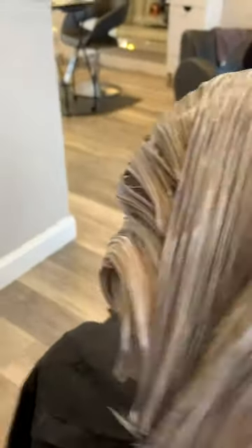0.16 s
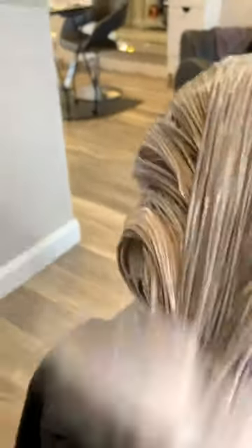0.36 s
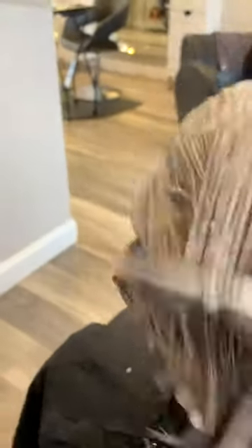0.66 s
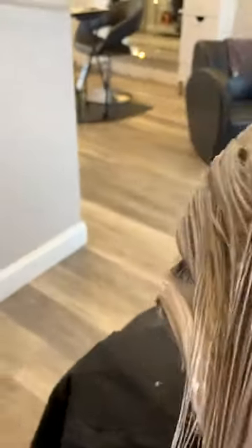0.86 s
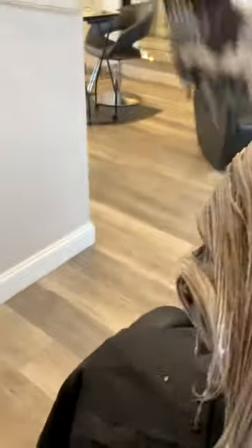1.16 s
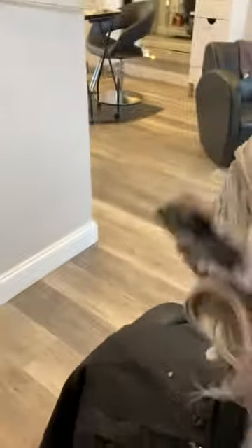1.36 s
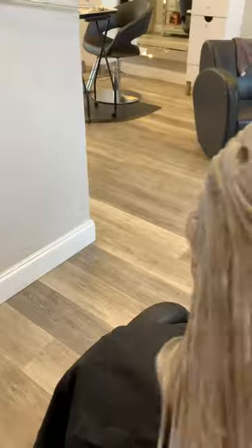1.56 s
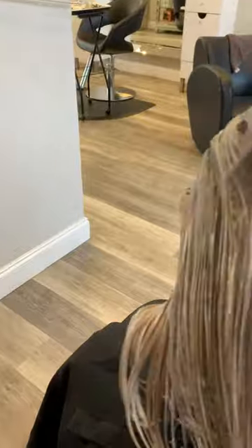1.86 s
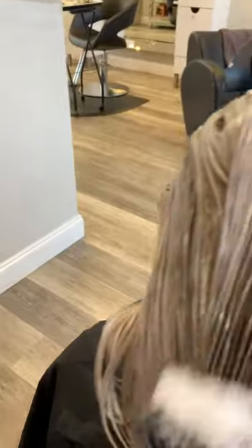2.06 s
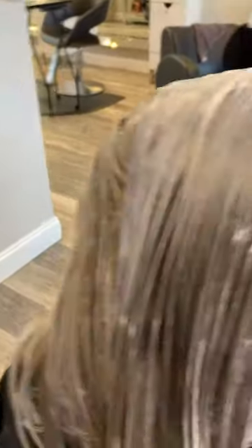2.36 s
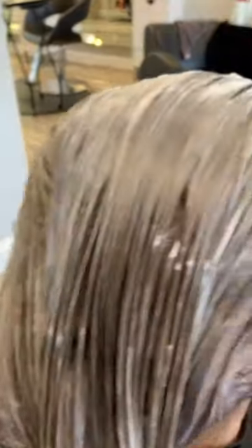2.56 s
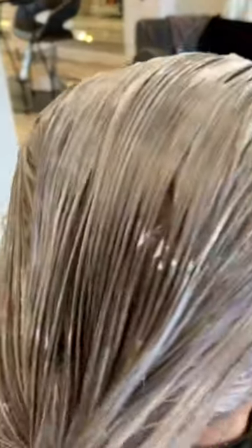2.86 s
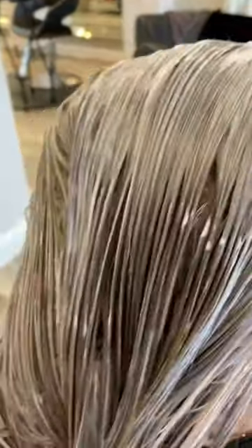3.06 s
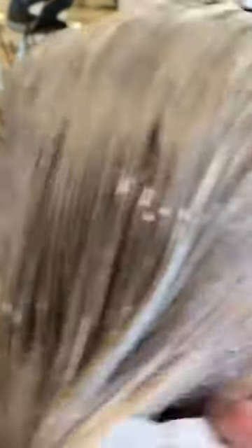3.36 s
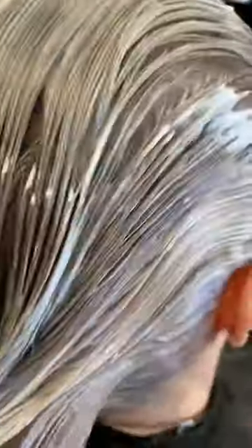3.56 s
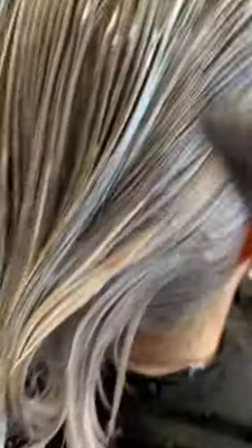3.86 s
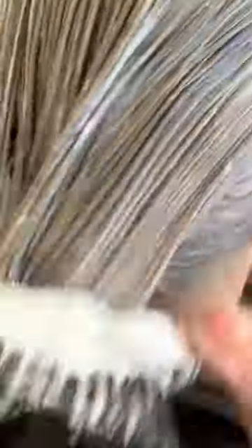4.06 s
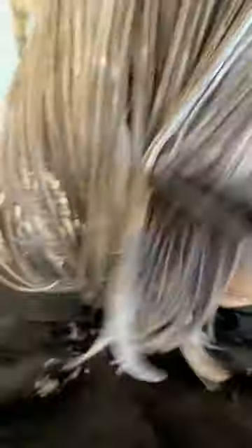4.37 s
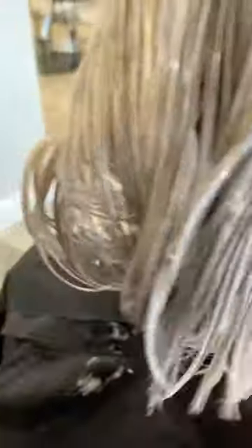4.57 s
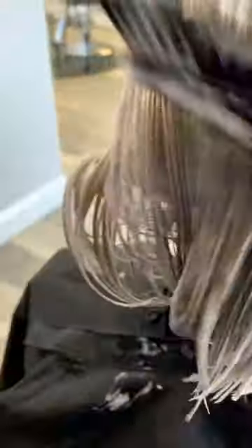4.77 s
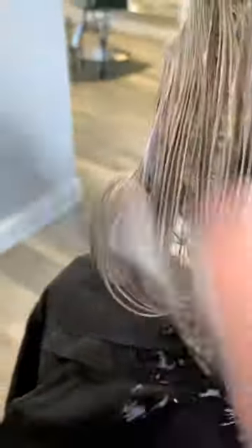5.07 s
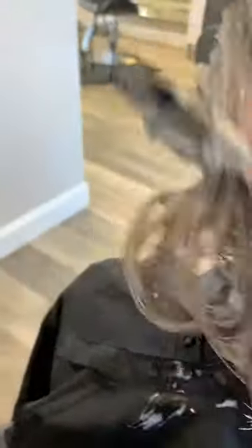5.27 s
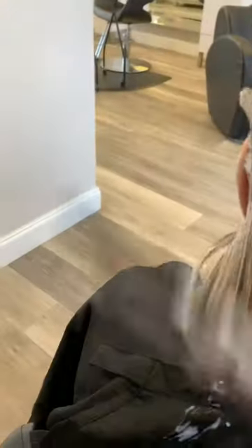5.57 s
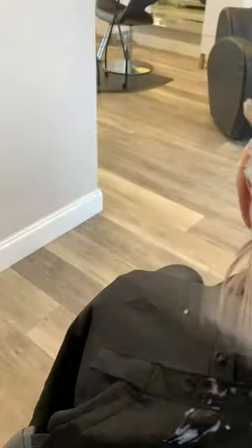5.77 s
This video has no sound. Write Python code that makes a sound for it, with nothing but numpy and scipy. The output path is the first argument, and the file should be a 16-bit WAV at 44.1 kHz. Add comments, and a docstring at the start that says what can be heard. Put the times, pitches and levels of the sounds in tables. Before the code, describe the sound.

A steady low hum, gently beating, and bassy ventilation rumble run throughout, with very faint air. The tail of a brush stroke opens at 0 s, crisp and hissy, ending by 0.2 with a thin, high squeak. Dull bumps around 0.5-0.6 lead to a crackling pull through wet hair at 0.6-0.85, then light touches and a sharp bristle click at 1.09. A longer stroke swells from 1.25 to 1.6; another, strong in the middle, runs 1.95-2.25 with a soft bump. Further pulls come at 2.55-2.9, a quieter one at 3.2, and a short one at 3.5. A loud bright swish at 3.93-4.17 is dotted with ticks. Shorter strokes follow at 4.4, 4.8, 5.2 and 5.67, with pronounced snaps near 5.13 and 5.74, ending in little ticks. Muffled cloth rustle moves beneath, strongest around 3.6-4. Everything is close and dry, with barely any room echo.

```python
"""A brush is drawn again and again through long wet hair, close to a hand-held phone in a salon.
Its strokes are a dense crackle of random slip impulses, filtered as strands and as a whole bundle.
Now and then a bristle snaps free: a click, a brief pitch, a knock of the pad and a shiver of noise.
Under it run a low hum of two sines and noise shaped as ventilation rumble, faint air and dull rustle.
A few faint squeaks and bumps are bands of noise that die away; loose hair crackles between strokes."""
import sys
import numpy as np
from scipy import signal
from scipy.fft import rfft, irfft, next_fast_len
from scipy.io import wavfile
from scipy.ndimage import uniform_filter1d, map_coordinates

SR = 44100
rng = np.random.default_rng(int(sys.argv[2]) if len(sys.argv) > 2 else 0)


def transcribe(u):
    """Save the signal u as a 16-bit wav file named by the first command-line argument.

    u: samples, shape (n,) or (channels, n), limited to [-1, 1]; the rate is SR.
    q: integer samples, one column per channel.
    """
    v = np.clip(np.atleast_2d(u).T, -1, 1)
    q = np.round(v * 32767).astype(np.int16)
    wavfile.write(sys.argv[1], SR, q)


N = 261513


def amp(db):
    """Decibels to gain."""
    return 10 ** (np.asarray(db) / 20)


def unit(x):
    """x at rms 1."""
    return x / np.sqrt(np.mean(x ** 2) + 1e-20)


def along(points, hz):
    """(Hz, value) points interpolated on a log frequency axis."""
    point_hz, value = np.transpose(points)
    return np.interp(np.log(hz + 1), np.log(point_hz + 1), value)


def clock():
    """The time of every sample in seconds."""
    return np.arange(N) / SR


def wobble(knots_per_s):
    """A smooth random curve through normally distributed knots."""
    knots = rng.standard_normal(int(N * knots_per_s / SR) + 4)
    return map_coordinates(knots, [clock() * knots_per_s])


def swells(rows):
    """A gain that swells smoothly around each (middle s, half length s, dB) row."""
    t = clock()
    return sum(amp(db) * np.exp(-((t - middle) / half) ** 2) for middle, half, db in rows)


def filtered(x, response):
    """x times a complex response of frequency."""
    size = next_fast_len(N + SR // 2)
    hz = np.fft.rfftfreq(size, 1 / SR)
    return irfft(rfft(x, size) * response(hz), size)[..., :N]


def coloured(x, spectrum):
    """x shaped by the given spectrum, at rms 1."""
    return unit(filtered(x, lambda hz: amp(along(spectrum, hz))))


def patches(shape, size):
    """A random field of rms 1 over (frequency, time), smooth over size = (bins, frames)."""
    over_hz = uniform_filter1d(rng.standard_normal(shape), size[0], axis=0)
    return unit(uniform_filter1d(over_hz, size[1], axis=1))


def patchy(x, patchy_db):
    """Stereo noise at rms 1 whose low and middle range comes and goes in small patches."""
    hz, _, z = signal.stft(x, SR, nperseg=1024)
    depth_db = patchy_db / (1 + (hz[:, None] / 3000) ** 2)
    gain = amp(depth_db * patches(z.shape[1:], size=(3, 9)))
    return unit(signal.istft(z * gain, nperseg=1024)[1][:, :N])


# Left-right likeness of room noise. Each row: frequency in Hz, correlation from 0 to 1.
LIKENESS = [(60, 1), (150, 0.89), (300, 0.046), (700, 0), (2000, 0)]


def diffuse(spectrum):
    """Stereo room noise of rms 1, alike at both ports only in the bass."""
    def mid_side(hz):
        angle = np.arccos(np.clip(along(LIKENESS, hz), -1, 1)) / 2
        return np.array([np.cos(angle), np.sin(angle)])

    mid, side = filtered(rng.standard_normal((2, N)), mid_side)
    return coloured(np.array([mid + side, mid - side]), spectrum)


# Machine hum. Each row: frequency in Hz, mean level in dB.
HUM_TONES = [(59.2, -52), (240, -59.5)]
BEAT_HZ, BEAT_DB = 0.707, 2.3


def hum():
    """Two unsteady sines; the low one beats slowly, as from two motors at nearly one speed."""
    t = clock()

    def tone(hz, db):
        level = amp(db + 0.68 * wobble(3.95)) * np.sqrt(2)
        return level * np.sin(2 * np.pi * hz * t + 0.025 * wobble(2.1))

    low, high = [tone(hz, db) for hz, db in HUM_TONES]
    return low * amp(BEAT_DB * np.cos(2 * np.pi * BEAT_HZ * t)) + high


# Ventilation spectrum. Each row: frequency in Hz, relative density in dB per Hz.
RUMBLE_SPECTRUM = [(11, -10), (18, 8.5), (44, 2), (62, 0), (72, -3.5), (87, -6), (203, -14.5), (224, -14),
                   (239, -9), (282, -21), (354, -23), (508, -44), (900, -78), (1170, -48), (1980, -120)]


def rumble():
    """Ventilation: steady noise, mostly bass."""
    return amp(-50.5) * diffuse(RUMBLE_SPECTRUM)


# Room air spectrum. Each row: frequency in Hz, relative density in dB per Hz.
AIR_SPECTRUM = [(400, 3), (800, 4), (1400, 2.5), (2200, 1.5), (2700, -4), (3500, -6), (5000, -8),
                (7000, -7), (11000, -11), (16000, -18)]
AIR_DB, AIR_WAVER_DB, AIR_PATCHY_DB = -79, 0.8, 4.5


def air():
    """Faint room noise, uneven in level and in spectrum."""
    return amp(AIR_DB + AIR_WAVER_DB * wobble(16)) * patchy(diffuse(AIR_SPECTRUM), AIR_PATCHY_DB)


# Arm and cape moves. Each row: middle in seconds, half length in seconds, level in dB.
MOVES_OF_CAPE = [(.47, .05, -71), (0.71, 0.26, -64.5), (1.12, 0.029, -64), (1.75, 0.049, -74),
                 (2.217, 0.12, -74), (2.912, 0.1, -65), (3.62, 0.14, -61.5), (3.83, 0.037, -65),
                 (4.02, 0.14, -63.5), (4.805, 0.17, -73), (5.274, 0.29, -73.5), (5.62, 0.11, -66.5)]
# Dull cloth spectrum. Each row: frequency in Hz, relative density in dB per Hz.
CLOTH_SPECTRUM = [(100, -8), (200, 1.5), (320, 2.5), (450, -5), (650, -16.5), (1200, -55)]
REST_DB, REST_WAVER_DB = -74.5, 4.5
FOLD_DB, FOLDS_PER_S, RUSTLE_PATCHY_DB = 2.6, 45, 4


def rustle():
    """Arm and cape never quite rest; each move swells in soft lumps as the folds give way."""
    rest = amp(REST_DB + REST_WAVER_DB * wobble(4.4))
    moves = swells(MOVES_OF_CAPE) * amp(FOLD_DB * wobble(FOLDS_PER_S))
    return (rest + moves) * patchy(diffuse(CLOTH_SPECTRUM), RUSTLE_PATCHY_DB)


def background():
    """Machine hum, ventilation rumble, faint air noise and the dull rustle of movement."""
    return hum() + rumble() + air() + rustle()


# Reverberation. Each row: frequency in Hz, t60 in seconds.
SALON_T60 = [(200, 0.7), (2000, 0.2), (8000, 0.019), (16000, 0.016)]


def salon(x):
    """The room's answer: decaying noise, each frequency dying at its own speed."""
    hz, t, z = signal.stft(rng.standard_normal((2, SR // 2)), SR, nperseg=256)
    decay = amp(-60 * t / along(SALON_T60, hz)[:, None])
    tail = signal.istft(z * decay, SR, nperseg=256)[1]
    return signal.fftconvolve(x, tail / np.linalg.norm(tail[0]), axes=1)[:, :N]


def fading_bands(rows):
    """Each row is a narrow, blurred band of noise that rises fast and dies away in the room."""
    out, t = np.zeros((2, N + SR)), np.arange(SR) / SR
    noise = diffuse([(20, 0), (16000, 0)])
    rise = 1 - np.exp(-t / 0.002)
    for start_s, hz, width_hz, db, t60_s in rows:
        start = round(start_s * SR)
        edges_hz = hz * np.exp(np.array([-.5, .5]) * width_hz / hz)
        sos = signal.butter(2, edges_hz, "band", fs=SR, output="sos")
        band = unit(signal.sosfilt(sos, noise[:, start:start + SR]))
        out[:, start:start + SR] += amp(db - 60 * t / t60_s) * rise * band
    return out[:, :N]


# Soft, dull bumps.
# Each row: start in seconds, centre in Hz, approximate width in Hz, level in dB, t60 in seconds.
BUMP_BANDS = [(.49, 103, 44, -42, 0.16), (.545, 130, 190, -50, 0.13), (.62, 28, 15, -30, 0.17),
              (.63, 90, 30, -48, .2), (.985, 316, 73, -56, 0.057), (2.17, 344, 42, -53.5, 0.33),
              (3.668, 370, 1200, -60, 0.083), (3.752, 305, 54, -50, 0.083), (3.962, 360, 130, -53, .04),
              (4.04, 340, 100, -54, .06)]


def bumps():
    """Soft knocks as fading bands of low noise."""
    return fading_bands(BUMP_BANDS)


# A thin squeak and a few faint scuffs.
# Each row: start in seconds, centre in Hz, approximate width in Hz, level in dB, t60 in seconds.
SQUEAK_BANDS = [(.178, 3207, 196, -50, 0.35), (.27, 3170, 130, -71, 0.77), (.435, 3400, 900, -72, 0.11),
                (.44, 2170, 220, -78, 0.84), (.5, 1190, 900, -76, 0.68), (.985, 2270, 700, -66.5, 0.21)]


def squeaks():
    """Squeak and scuffs as fading bands of higher noise."""
    return fading_bands(SQUEAK_BANDS)


# Sound bends round the phone to the right port. Each row: frequency in Hz, left lead in radians.
LEFT_LEAD = [(1100, .1), (2000, .6), (2600, 2.7), (3100, 3.1), (3900, 1.5), (5000, 3.1), (7300, 6.1),
             (9000, 6.4), (11200, 9.2), (13000, 9.6), (15000, 12.4)]


def at_ports(x):
    """A near source as the two microphone ports get it, half of the lead on each side."""
    sides = np.array([[1], [-1]])
    return filtered(x, lambda hz: np.exp(.5j * along(LEFT_LEAD, hz) * sides))


# Straight sound from the brush. Each row: frequency in Hz, share of the power from 0 to 1.
DIRECT_SHARE = [(700, .3), (1100, .62), (1600, .9), (2300, .55), (2950, .96), (3600, .6), (4300, .55),
                (5150, .98), (6200, .76), (8200, .92), (10200, .76), (12000, .97), (14000, .75),
                (15500, .93)]


def spread(make):
    """A source near the brush: part arrives straight, the rest glances off head and hand to each port."""
    straight = filtered(at_ports(make()), lambda hz: np.sqrt(along(DIRECT_SHARE, hz)))
    glancing = np.array([make(), make()])  # separate draws for the ports
    return straight + filtered(glancing, lambda hz: np.sqrt(1 - along(DIRECT_SHARE, hz)))


def slips(rate_per_s, spread_db):
    """Tiny impulses of uneven size and random sign at random moments, rms 1."""
    fired = rng.random(N) < rate_per_s / SR
    size = amp(spread_db * np.minimum(rng.standard_normal(N), 3))
    return unit(fired * size * rng.choice([-1, 1], N) / np.sqrt(rate_per_s))


# Loose hair shifting. Each row: middle in seconds, half length in seconds, level in dB.
TOUCH_SWELLS = [(0.48, 0.27, -78.5), (0.91, 0.036, -84), (1.76, 0.25, -79.5), (2.39, 0.047, -77.5),
                (2.55, 0.05, -77.5), (3.81, 0.18, -80), (4.71, 0.04, -79), (5.12, 0.043, -67),
                (5.53, 0.048, -80)]
# Loose hair spectrum. Each row: frequency in Hz, relative density in dB per Hz.
TOUCH_SPECTRUM = [(300, -12), (900, 1.5), (2000, -3), (4000, -2), (8000, -5), (16000, -4.5)]


def touches():
    """Loose wet hair shifts with a faint, sparse crackle."""
    return swells(TOUCH_SWELLS) * spread(lambda: coloured(slips(830, spread_db=1), TOUCH_SPECTRUM))


def ringing(modes, t, pitch=1):
    """A sum of dying sines, all scaled by one pitch ratio."""
    return sum(amp(db - 60 * t / t60_s) * np.sin(2 * np.pi * pitch * hz * t) for hz, db, t60_s in modes)


def highpassed(x, edge_hz):
    """x without the range below the edge."""
    return signal.sosfilt(signal.butter(2, edge_hz, "high", fs=SR, output="sos"), x)


# Single bristles landing or snapping free. Each row: start in seconds, relative level in dB,
# pad knock and bristle ring in dB relative to the snap, snap pitch in Hz, pad pitch as a ratio.
SNAPS = [(.6035, -33.5, -4, -28, 3000, 0.86), (0.9472, -41.5, -34, -12, 4970, 1),
         (1.002, -49, -18, -23, 2500, 0.9), (1.0405, -51, -7, -32, 3530, 1),
         (1.0879, -22, -9, -51, 3600, 1), (1.265, -54, -29, -25, 5000, 1),
         (1.8612, -49.5, -38, -32, 8000, 0.77), (1.8774, -47, -22, -22, 4000, 0.95),
         (1.9472, -43, -30, -20, 4000, 1), (1.973, -29, -24, -19, 3050, 1),
         (2.5743, -31.5, -17, -5.5, 4000, 0.92), (2.6197, -29.5, -23, -8, 4000, 1),
         (3.1031, -43.5, -44, -21, 5950, 1), (3.23, -33.5, -22, -20, 5000, 1),
         (3.9028, -49, -42, -25, 9200, 0.89), (3.943, -33, -11, -31, 3040, 0.97),
         (4.0686, -29, -25, -23, 6000, 1), (4.1393, -27.5, -15, -23, 5030, 0.96),
         (4.2104, -39.5, -40, -26, 8000, 1), (4.383, -56, -24, -22, 2500, 0.91),
         (4.8, -37, -12, -29, 2500, 0.8), (5.1251, -20, -17, -32, 6140, 0.83),
         (5.231, -51, -25, -25, 4000, 0.89), (5.5648, -55, -30, -30, 7000, 1),
         (5.699, -34, -20, -25, 4050, 0.77), (5.7405, -23, -31, -24, 4500, 1),
         (5.8374, -27.5, -24, -25, 9100, 0.67), (5.8721, -39, -13, -25, 3500, 1)]
# Brush pad modes. Each row: frequency in Hz before the pitch ratio, relative level in dB, t60 in seconds.
PAD_MODES = [(570, -25, 0.02), (2060, -19, 0.028), (2217, -14.5, 0.027), (3400, -46, 0.0023),
             (4500, -13, 0.0062)]
# Plucked bristle modes. Each row: frequency in Hz, relative level in dB, t60 in seconds.
BRISTLE_MODES = [(5350, -17.5, 0.059), (7140, -6.5, 0.02)]
SNAP_RING_DB, SNAP_T60_S = -10, 0.0019


def ticks():
    """A bent bristle snaps back at its own pitch and rings, knocks the pad and shivers its neighbours."""
    near, around = np.zeros(N + SR), np.zeros((2, N + SR))
    t = np.arange(SR // 10) / SR
    click = (t == 0).astype(float)
    shiver_decay = amp(-28 - 60 * t / .03) + amp(-44 - 60 * t / .17)
    for start_s, db, knock_db, ring_db, snap_hz, pad_pitch in SNAPS:
        span = slice(round(start_s * SR), round(start_s * SR) + len(t))
        snap_tone = amp(SNAP_RING_DB - 60 * t / SNAP_T60_S) * np.cos(2 * np.pi * snap_hz * t)
        snap = highpassed(click, 0.62 * snap_hz) + snap_tone
        knock = amp(knock_db) * ringing(PAD_MODES, t, pad_pitch)
        ring = amp(ring_db) * ringing(BRISTLE_MODES, t)
        shiver = highpassed(rng.standard_normal((2, len(t))), .7 * snap_hz) * shiver_decay
        near[span] += amp(db + 3.5) * (snap + knock + ring)
        around[:, span] += amp(db + 5) * shiver
    return at_ports(near[:N]) + around[:, :N]


PATCHY_DB, DRIFT_DB = 4.6, 1.7  # small shifting resonances; colour drift as the brush meets new strands
RING_DB, RING_OCTAVES = 4.5, .08  # height and half width of the bundle's resonance


def strands(x, edge_hz, ring_hz):
    """Taut strands sound above a low edge, with a sinking resonance, small shifting ones and a drift."""
    hz, t, z = signal.stft(x, SR, nperseg=1024)
    hz = hz[:, None]  # one row per frequency
    fine_db = PATCHY_DB / (1 + hz / 7000) * patches(z.shape, size=(2, 5))
    drift_db = DRIFT_DB * patches(z.shape, size=(30, 6))
    octaves_off = np.log2((hz + 1) / np.interp(t, clock(), ring_hz))
    ring_db = RING_DB / (1 + (octaves_off / RING_OCTAVES) ** 2)
    above = (hz / np.interp(t, clock(), edge_hz)) ** 4
    gain = amp(fine_db + drift_db + ring_db) * np.sqrt(above / (1 + above))
    return signal.istft(z * gain, nperseg=1024)[1][:N]


# Brush strokes, long pulls and light touches alike. Each row: start in seconds, length in seconds,
# attack in seconds, relative hiss level in dB, mid-stroke swell in dB, rise from start to end in dB,
# relative rasp over the hiss in dB, thinning of the rasp along the stroke in dB, low edge at the start in Hz.
PULLS = [ (0.0, .19, 0.00019, -52, 0, 1, -25, 27, 2090), (0.592, 0.24, 0.0033, -49, 3, 1, 3, 26, 1350),
         (0.83, 0.079, 0.006, -65.5, 2, -19, -23.5, 6, 1300),
         (0.929, 0.066, 0.027, -62, -0.5, -5.5, -8, -7, 1300),
         (1.079, 0.066, 0.0023, -70, -1.5, 0.5, 12, 2, 1300),
         (1.249, 0.37, 0.022, -52.5, 7.5, 6, 4.5, 12.5, 2330),
         (1.952, 0.31, 0.0026, -48.5, 15, -7, -3, 2, 1560),
         (2.565, 0.35, 0.015, -50.5, 1, 1, -23, -13, 3500),
         (3.213, 0.27, 0.0076, -57.5, -3, -8, 8, -26, 4340),
         (3.49, 0.11, 0.016, -51.5, -1.5, 3, 2.5, 27, 1030),
         (3.639, 0.033, 0.0048, -69.5, 7, -4, 10, 3, 900),
         (3.928, 0.24, 0.0022, -46.5, 7, 0.5, -4, 30, 1700),
         (4.181, 0.049, 0.0024, -68, 2, -14, -3, -4, 1300),
         (4.378, 0.17, 0.012, -52, -2.5, -7.5, -8.5, 41, 1680),
         (4.793, 0.17, 0.004, -50, 4.5, 5.5, 4.5, 34, 1050),
         (5.222, 0.24, 0.025, -48.5, 1.5, -1.5, 1.5, 22, 1410),
         (5.674, 0.16, 0.019, -48.5, 0.5, -3.5, 0.5, 16, 1530),
         (5.861, 0.021, 0.0022, -56, 11.5, -8.5, 7, -33, 1300), ]
BITE_DB = 28.5  # climb as the bristles sink in
LET_GO_DB, LET_GO_S = 17, 0.021  # quick drop as the brush leaves the hair
SETTLE_DB_PER_S = 202  # the freed strands then settle
RASP_SWELL_DB = 12  # the bundle drags most in mid-stroke
RASP_LINGERS_DB = 22.5  # the falling bundle outlasts the hiss
EDGE_END_HZ, EDGE_FALL_S = 886, 0.071  # off the scalp the free strands lengthen and reach lower
RING_START_HZ, RING_END_HZ = 1820, 1476  # the taut bundle's resonance sinks as the brush travels down


def stroke_controls():
    """Hiss and rasp gains, low edge and resonance: each stroke bites in, swells, lets go and settles."""
    hiss, rasp = np.zeros(N), np.zeros(N)
    edge_hz, ring_hz = np.full(N, float(EDGE_END_HZ)), np.full(N, float(RING_END_HZ))
    for start_s, length_s, attack_s, hiss_db, swell_db, rise_db, rasp_db, thin_db, start_edge_hz in PULLS:
        start = max(round(start_s * SR), 0)
        span = slice(start, start + SR)
        t = np.arange(min(SR, N - start)) / SR
        travel = 2 * np.minimum(t / length_s, 1) - 1  # -1 where the brush lands, 1 where it leaves
        after_s = np.maximum(t - length_s, 0)
        freed = 1 - np.exp(-after_s / LET_GO_S)
        pull_db = hiss_db - swell_db * travel ** 2 + rise_db * travel / 2
        bite_db = -BITE_DB * np.exp(-t / attack_s)
        level_db = pull_db + bite_db - LET_GO_DB * freed - SETTLE_DB_PER_S * after_s
        drag_db = rasp_db - thin_db * travel / 2 - RASP_SWELL_DB * travel ** 2
        hiss[span] += amp(level_db)
        rasp[span] += amp(level_db + drag_db + RASP_LINGERS_DB * freed)
        edge_hz[span] = EDGE_END_HZ + (start_edge_hz - EDGE_END_HZ) * np.exp(-t / EDGE_FALL_S)
        ring_hz[span] = np.interp(travel, [-1, 1], [RING_START_HZ, RING_END_HZ])
    return hiss, rasp, edge_hz, ring_hz


# Bristles slipping on single strands. Each row: frequency in Hz, relative density in dB per Hz.
HISS_SPECTRUM = [(150, -35), (600, -12), (1000, -11.5), (1250, -10.5), (1500, -7), (3000, -5.3),
                 (4200, -2.8), (6300, 0), (10000, 0), (13000, -.5), (16000, -3)]
# Rasp of the whole bundle under the brush. Each row: frequency in Hz, relative density in dB per Hz.
RASP_SPECTRUM = [(150, -35), (400, -7), (750, -7.5), (1100, -7.5), (1350, -4), (1600, -.5), (1850, -1),
                 (2100, 1), (2600, -.3), (3300, -.8), (4200, -.5), (5200, -8), (9000, -35)]
CATCH_DB, CHATTER_DB = 1.0, 1.1  # strands bunch up and let go, slowly and quickly
HISS_GAIN_DB, RASP_GAIN_DB, POPS_DB = 5.0, -10.5, -16


def strokes():
    """Bristles slip over wet strands: the harder the pull, the denser and louder the slips."""
    hiss, rasp, edge_hz, ring_hz = stroke_controls()
    slips_per_s = 800 + 7500 * hiss / hiss.max()
    catch = amp(CATCH_DB * wobble(45) + CHATTER_DB * wobble(220))

    def friction():
        """Fine slips and a few sharper wet pops sound both the strands and the whole bundle."""
        pops = slips(60, spread_db=4)
        impulses = slips(slips_per_s, spread_db=1.5) + amp(POPS_DB) * pops
        grains = strands(impulses, edge_hz, ring_hz)
        strand_hiss = amp(HISS_GAIN_DB) * hiss * coloured(grains, HISS_SPECTRUM)
        bundle_rasp = amp(RASP_GAIN_DB) * rasp * coloured(grains, RASP_SPECTRUM)
        return catch * (strand_hiss + bundle_rasp)

    return spread(friction)


def scene():
    """The close brush and hair, a little of their echo, and the room's own sounds."""
    brush = strokes() + ticks() + touches()
    echo = amp(-24.0) * salon(brush)
    return brush + echo + squeaks() + bumps() + background()


TOP_HZ = 15850


def record(dry):
    """The phone cuts off steeply at its band limit."""
    return filtered(dry, lambda hz: 1 / (1 + (hz / TOP_HZ) ** 200))


dry = scene()
out = record(dry)
transcribe(out)
```